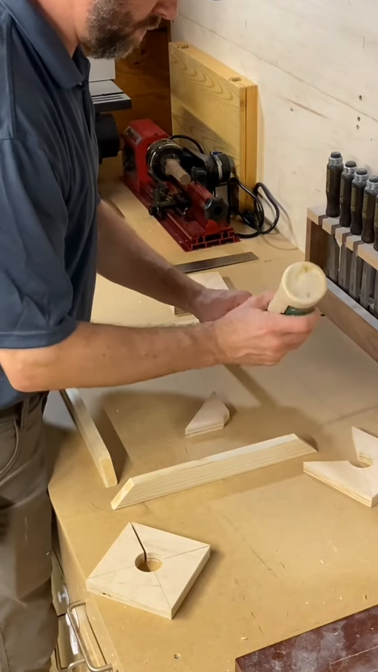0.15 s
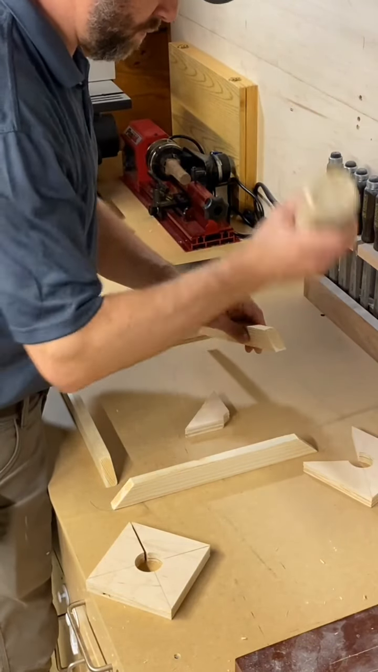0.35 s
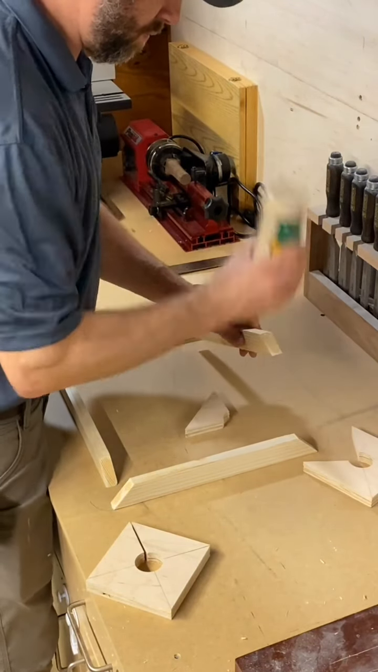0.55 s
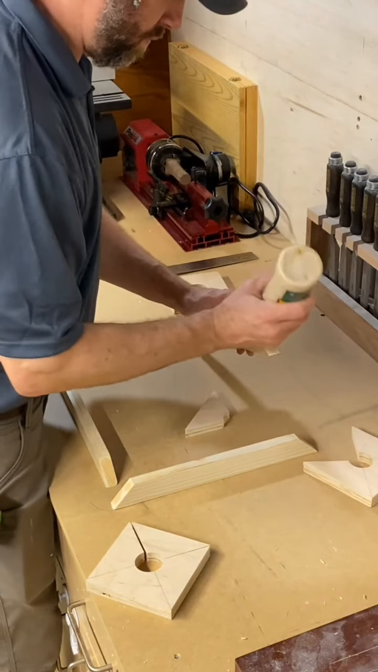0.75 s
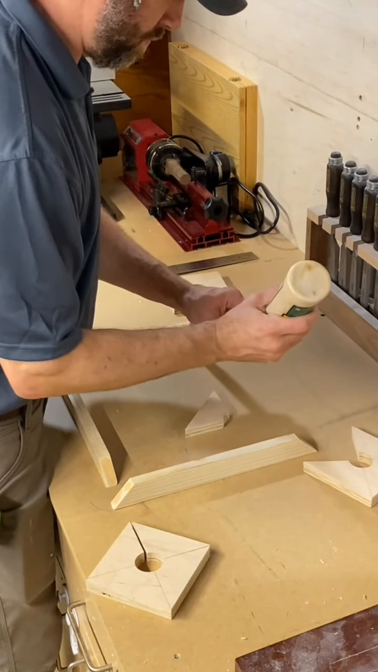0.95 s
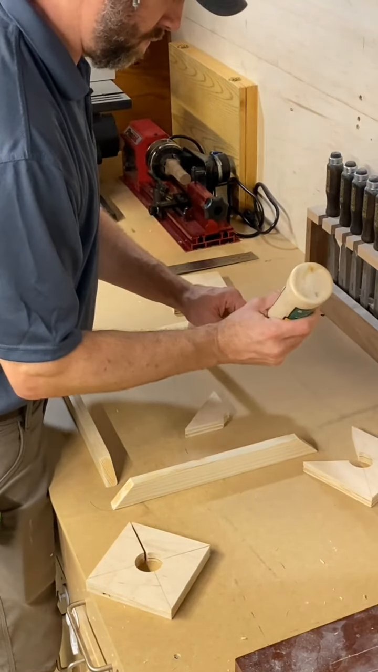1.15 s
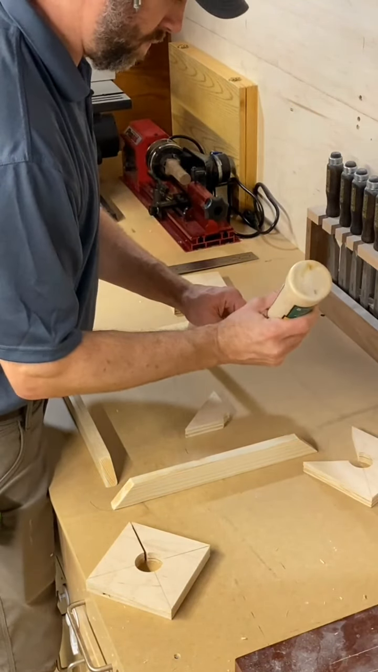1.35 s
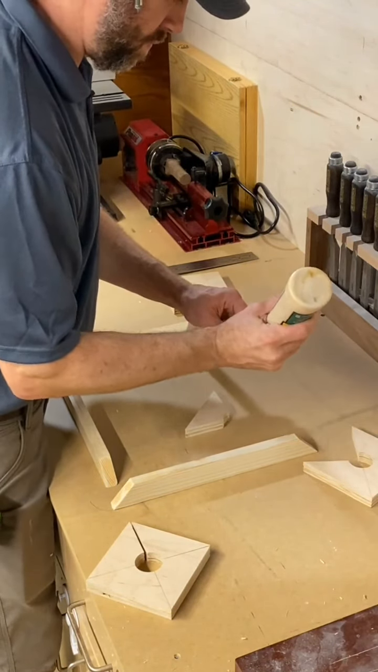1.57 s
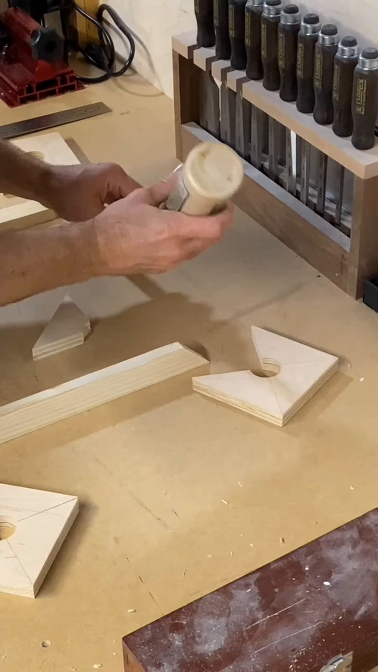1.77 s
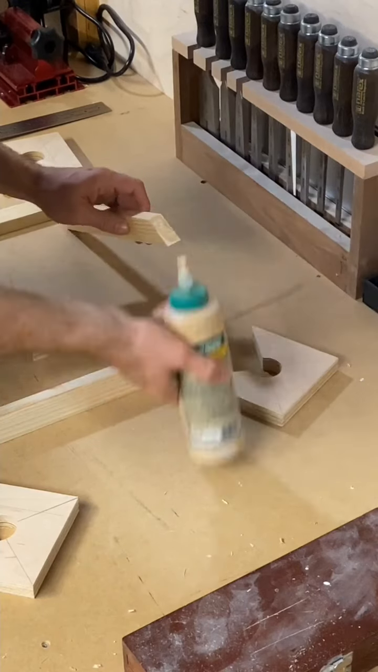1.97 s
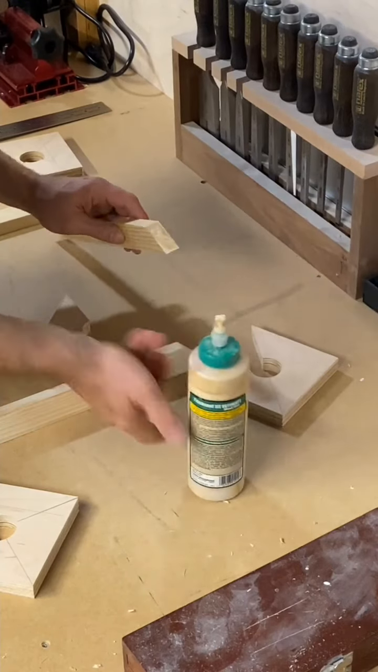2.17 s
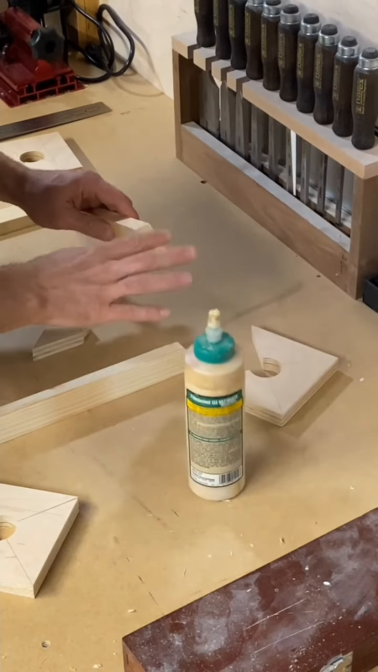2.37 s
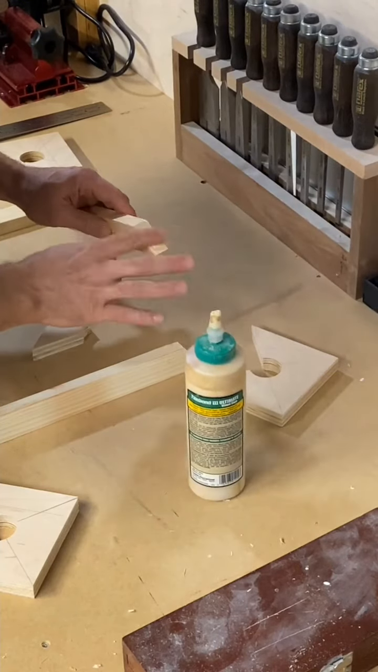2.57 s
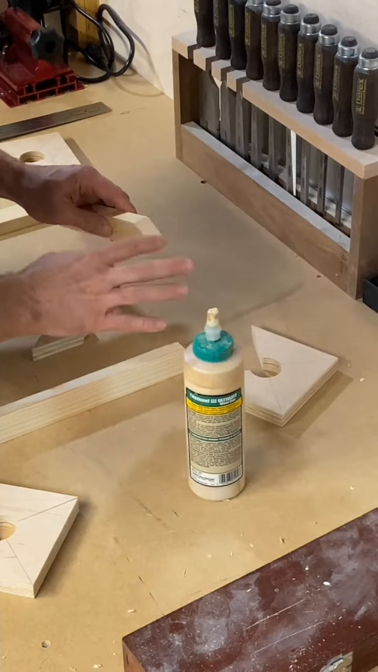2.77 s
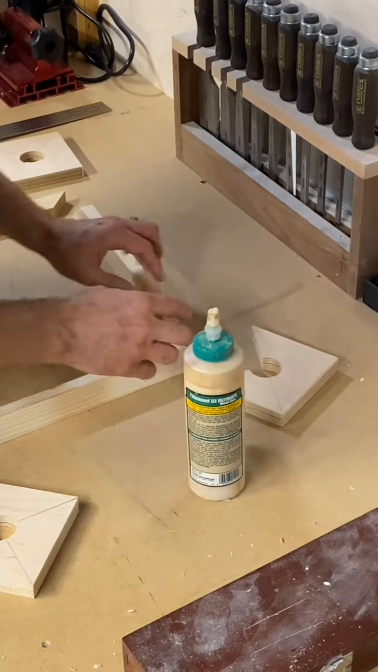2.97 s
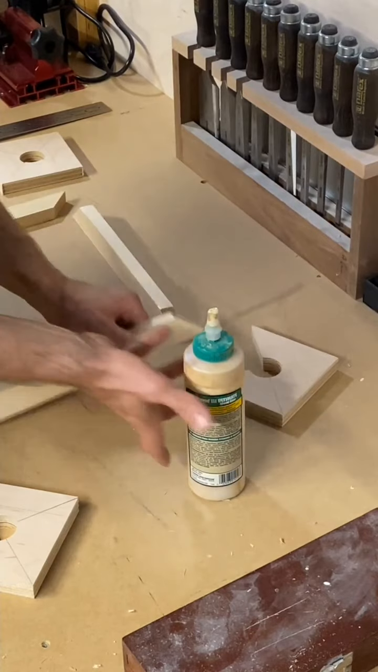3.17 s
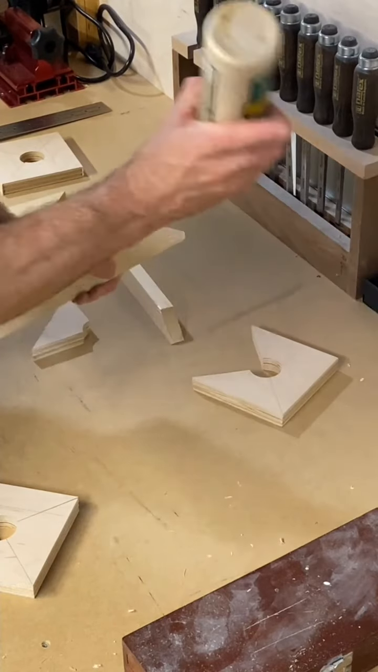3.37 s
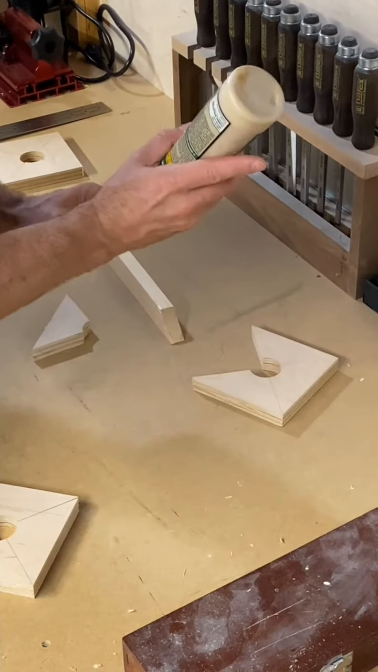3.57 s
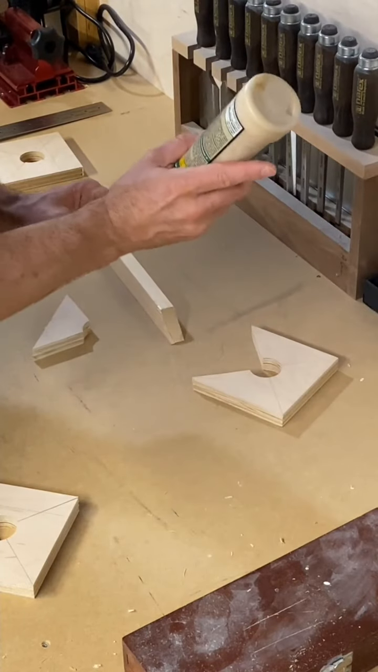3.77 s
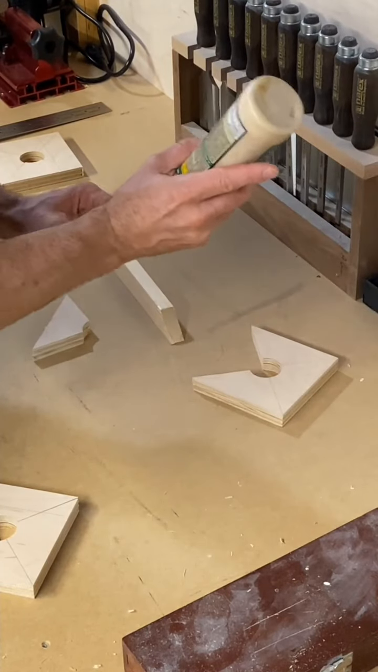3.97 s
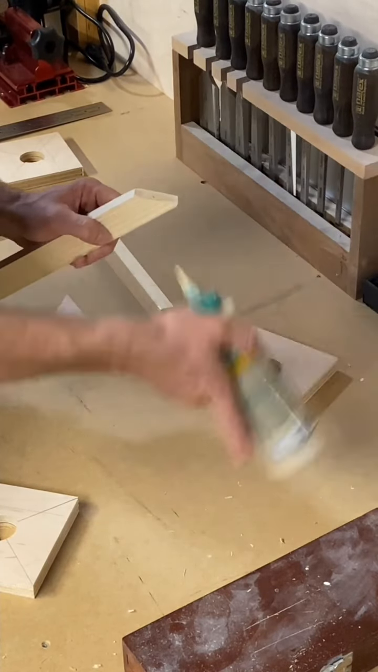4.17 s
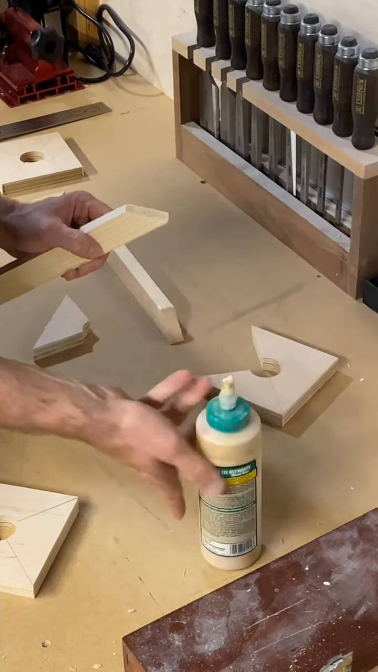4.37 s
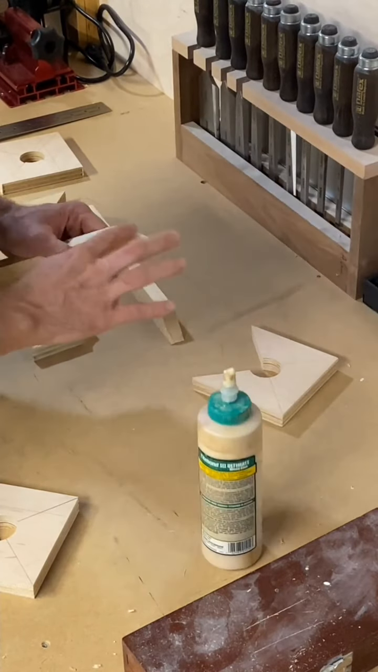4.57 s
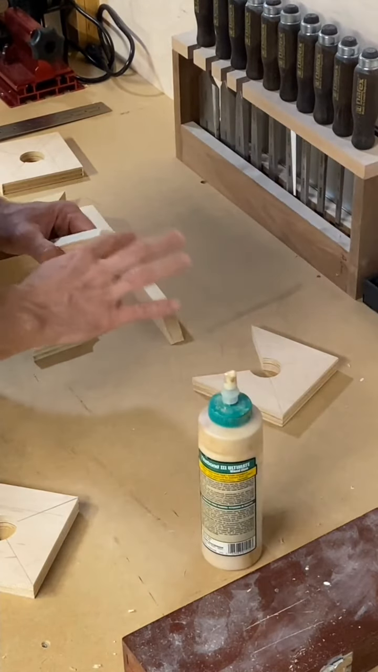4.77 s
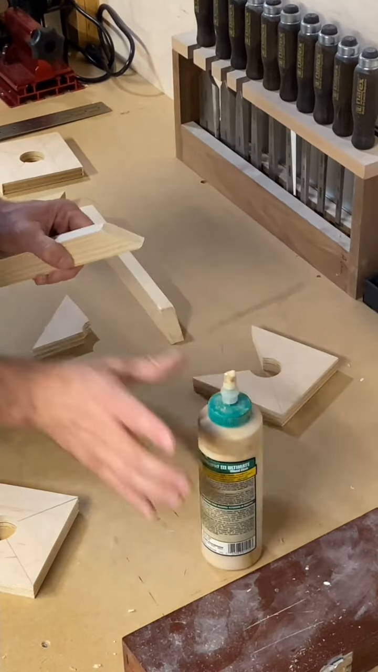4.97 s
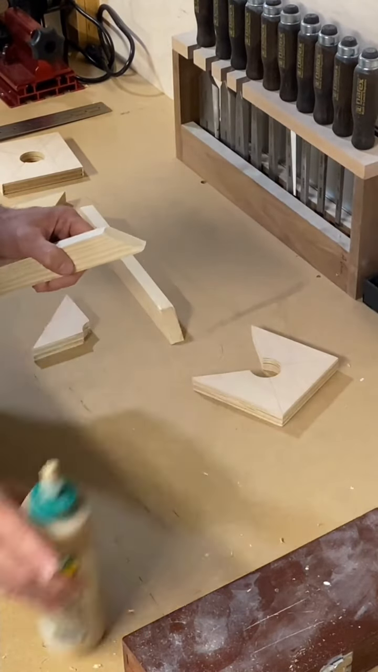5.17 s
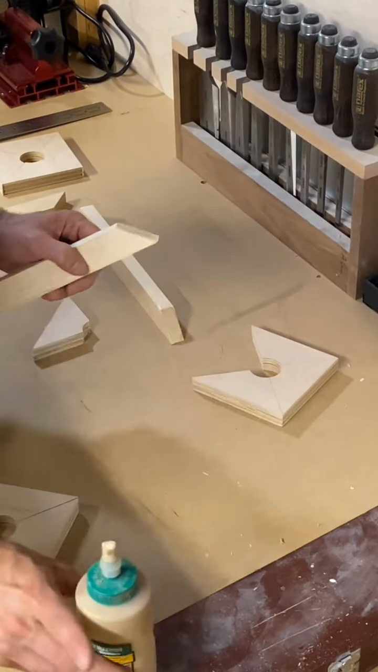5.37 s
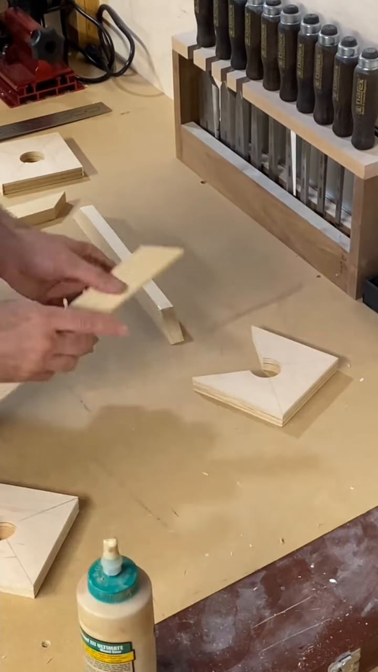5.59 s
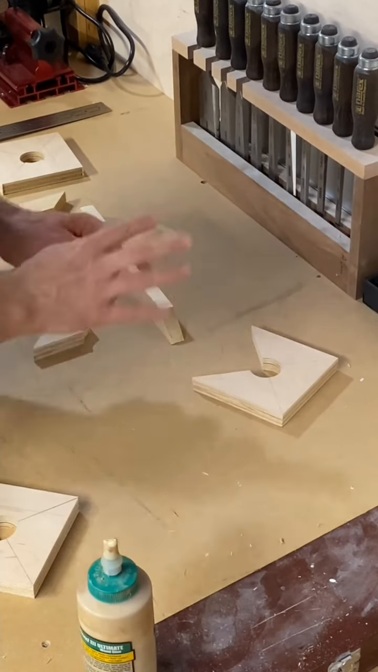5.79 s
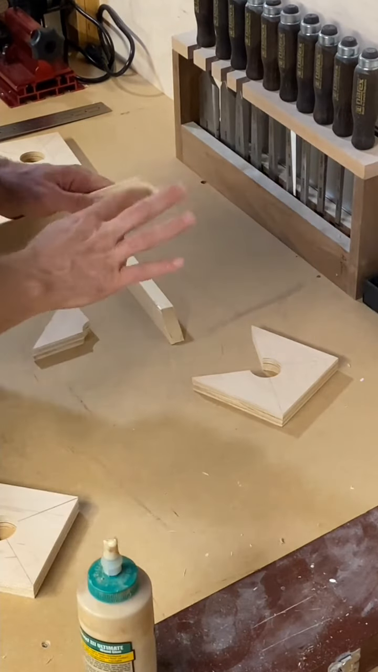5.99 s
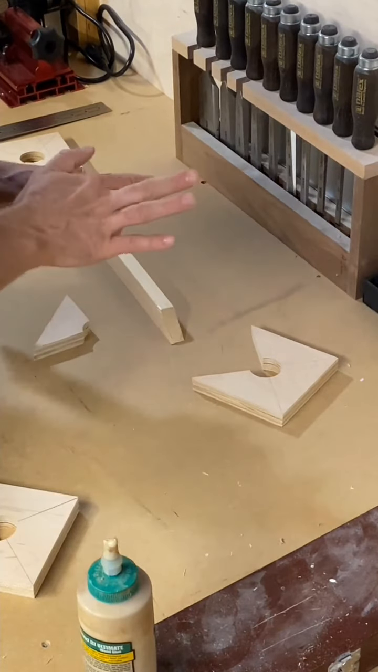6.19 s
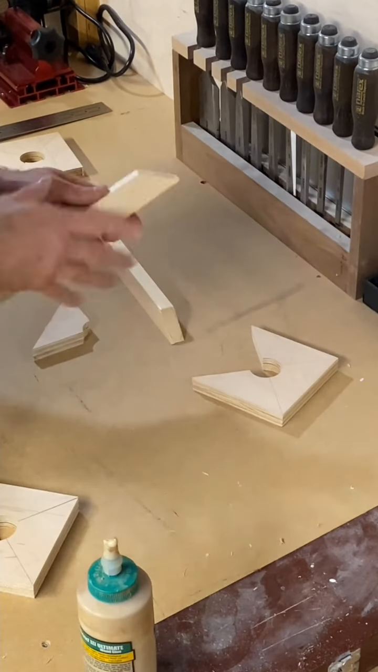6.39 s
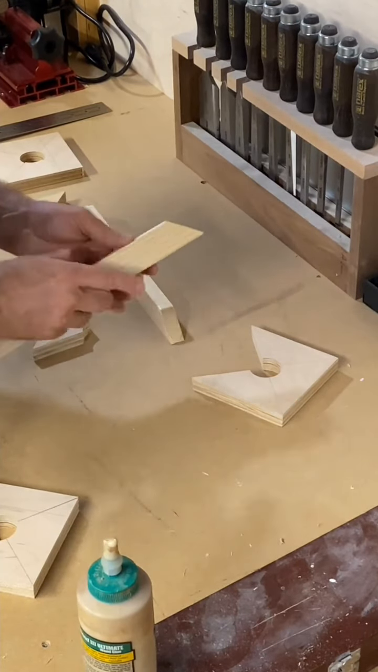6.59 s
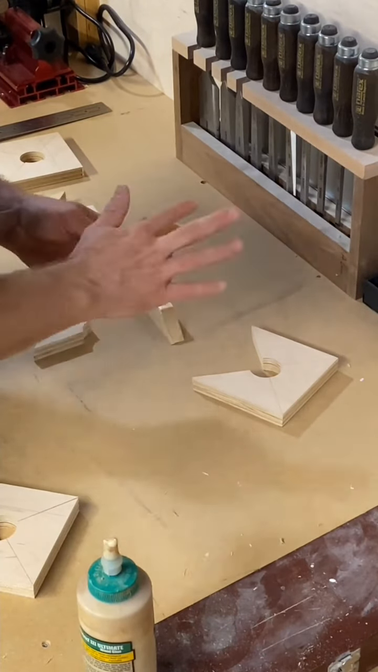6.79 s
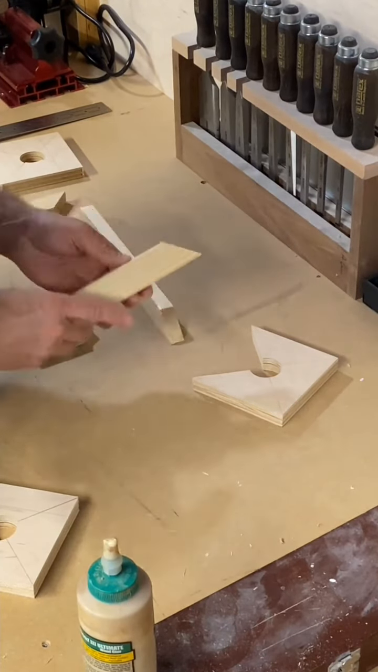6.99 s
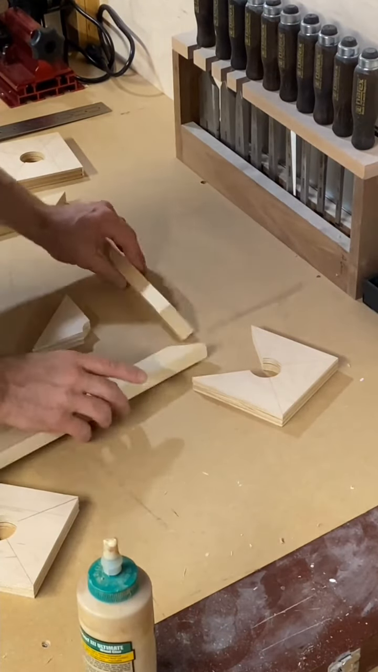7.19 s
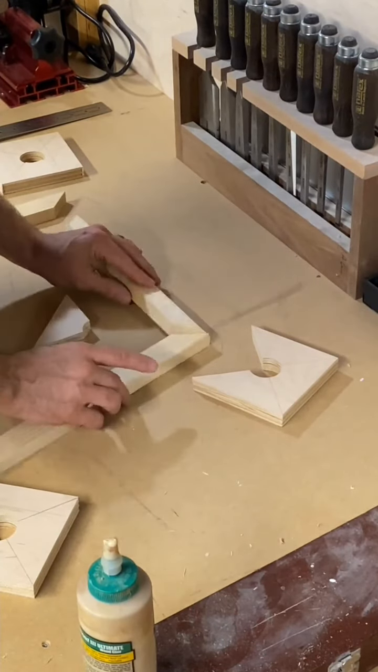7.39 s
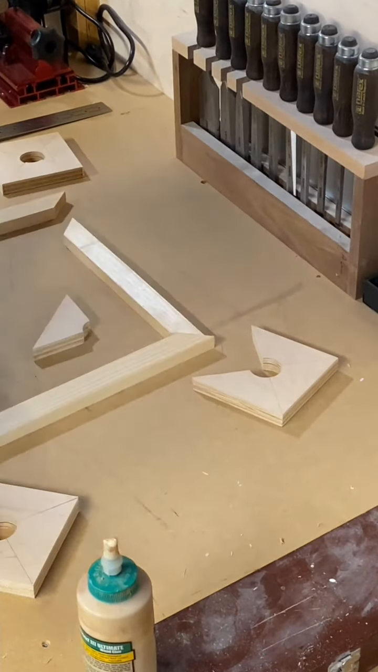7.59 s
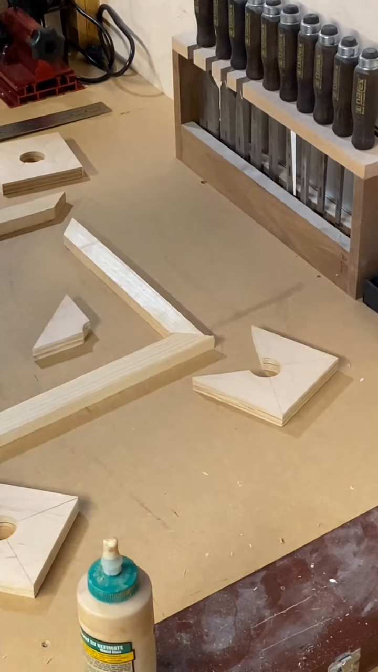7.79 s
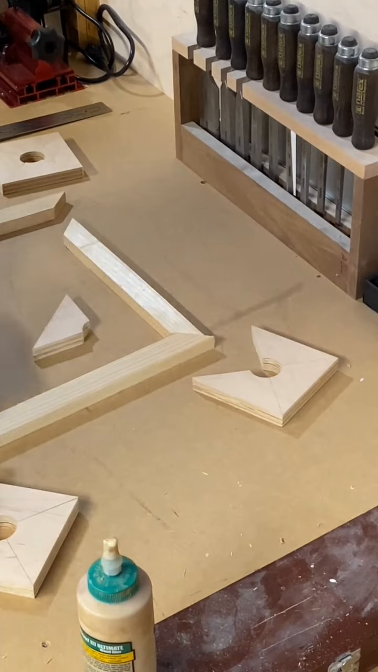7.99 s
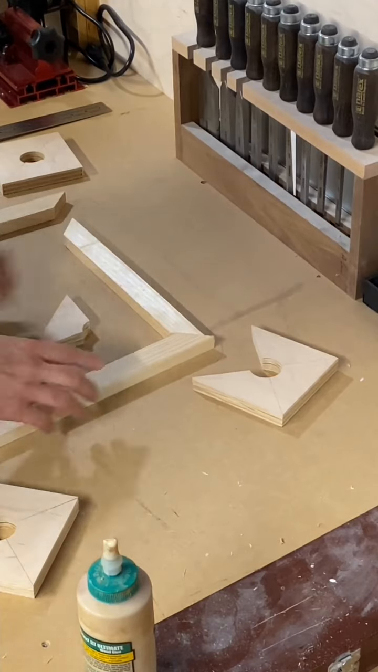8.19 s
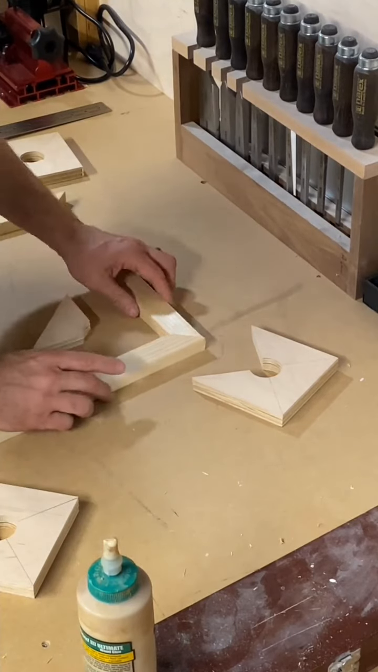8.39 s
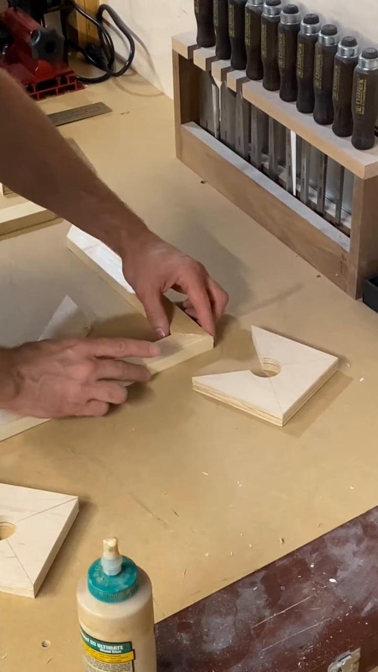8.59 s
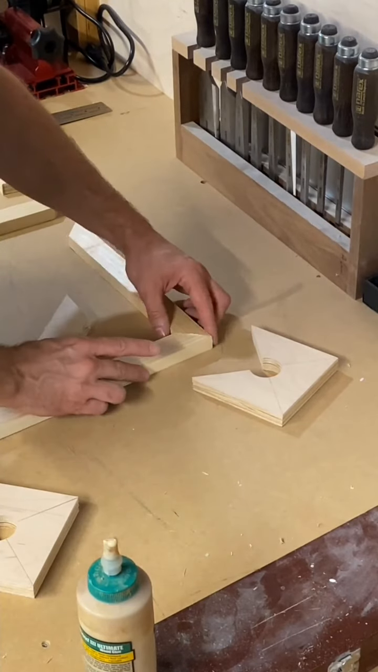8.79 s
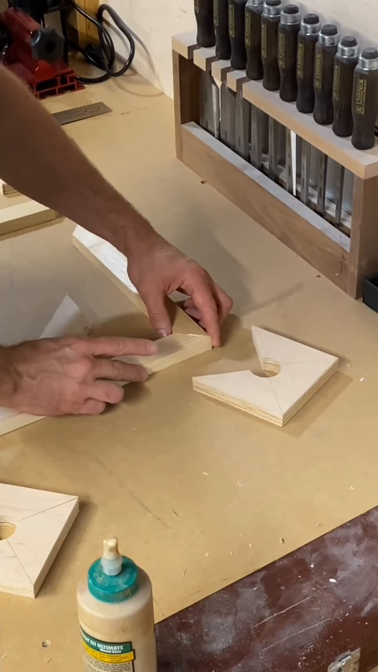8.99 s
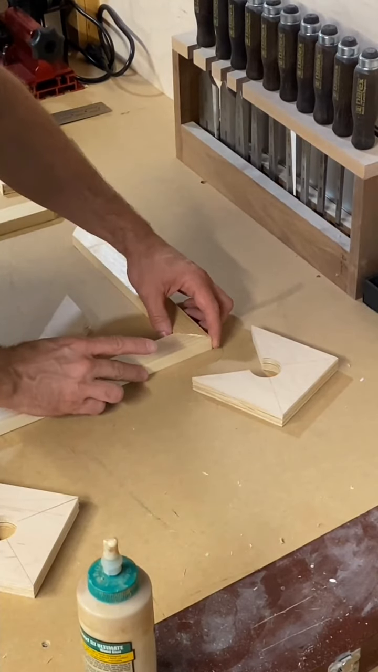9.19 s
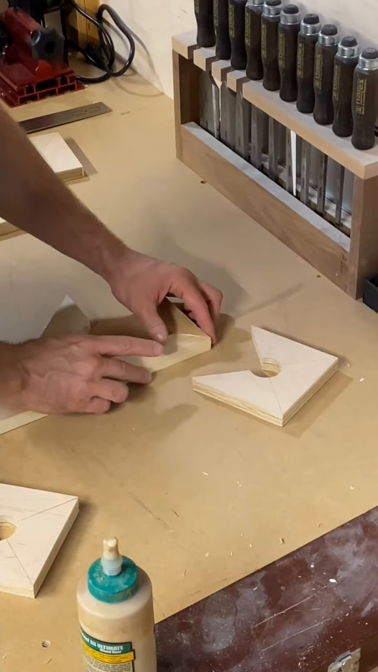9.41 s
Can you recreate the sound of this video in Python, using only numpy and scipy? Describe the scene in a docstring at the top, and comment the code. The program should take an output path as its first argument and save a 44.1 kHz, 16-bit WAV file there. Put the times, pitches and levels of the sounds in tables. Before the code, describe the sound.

Close view of a workbench in a small room. A soft airy rustle and faint clicks come from a shaken glue bottle, then a tiny low blip and a heavy thump as it is set down. Sticks clack together, the bottle thumps again and is shoved with a judder, fingers wipe wood, and sticks knock and slide into place over a low unsteady hum.

```python
"""Wooden sticks are laid on a bench, knocked together and slid into place as a frame is glued up.
Each contact is a short force that excites damped modes of stick and bench and the reflections of a small workshop.
A plastic glue bottle is shaken, squeezed, set down twice and pushed aside, by blows and shaped friction noise.
Fingers wiping, sliding and brushing are grainy noise under bell-shaped strokes; one low blip is a gliding sine.
A low, restless hum of filtered noise lies behind it all."""
import sys
import numpy as np
from scipy import signal
from scipy.fft import rfft, irfft, next_fast_len
from scipy.io import wavfile
from scipy.ndimage import map_coordinates

SR = 44100
rng = np.random.default_rng(int(sys.argv[2]) if len(sys.argv) > 2 else 0)


def master(y):
    """Save y as 16-bit WAV."""
    cut = np.clip(np.atleast_2d(y).T, -1, 1)
    pcm = np.round(cut * 32767)  # scale
    wavfile.write(sys.argv[1], SR, pcm.astype(np.int16))


N = 416744
TIME = np.arange(N) / SR
SIZE = 16384  # length of an impulse response, samples
HZ = np.fft.rfftfreq(SIZE, 1 / SR)
TOP_HZ = 16000  # upper band limit

# modes of the bench top: f/Hz, relative level/dB, t60/s
BENCH = [(129.1, 19, 0.3), (195.8, 2.5, 0.19), (248.8, 11.5, 0.18), (294.4, 16.5, 0.21), (344, 14, 0.17),
         (396, 9.5, 0.15), (474, -3, .2), (568, 8, 0.11), (615, 7.5, .2), (710, 10, 0.066), (860, -1, 0.28),
         (950, 12, 0.2), (1048, 8.5, .15), (1203, 11, 0.061), (1304, 12, 0.28), (1378, 16, .15),
         (1620, 4, .14), (1745, 3, 0.36), (1900, -1.5, .12), (2356, 13, .1), (2565, -4, .1),
         (3063, 3.5, 0.15), (3400, 9, 0.066), (3980, 12, .08), (4250, 4.5, 0.24), (4760, 13.5, 0.054)]
# bending modes of a free stick: f/Hz, relative level/dB, t60/s
STICK = [(853, -10, .13), (2205, 12, .19), (3570, 10, 0.064), (3690, 14.5, 0.037), (3920, 6.5, 0.031),
         (5410, 17, 0.025), (5550, 11.5, 0.2), (6410, 11, 0.047), (7800, 12, 0.23), (9350, 15, .1),
         (10100, 10, .12)]
# centres of the thud, knock, clack, snap and tick bands: f/Hz
BAND_HZ = [230, 650, 1550, 4300, 8500]
# stereo width of noise and reflections: f/Hz, side level relative to mid/dB
SPREAD = [(140, -22), (330, -13.5), (770, -11), (1170, -8), (1790, -7), (2740, -3), (4190, -18),
          (6410, -30.5), (10000, -37), (15000, -17.5)]


def amp(db):
    """The level law: decibels to an amplitude ratio."""
    return 10 ** (np.asarray(db) / 20)


def unit(x):
    """Normalisation to a root-mean-square value of 1."""
    return x / np.sqrt(np.mean(x ** 2) + 1e-20)


def together(parts_db):
    """Incoherent addition: the powers of simultaneous sounds sum."""
    return 10 * np.log10(np.sum(amp(parts_db) ** 2, axis=0))


def along(points, hz):
    """Interpolation of (f/Hz, value) points on a logarithmic frequency axis."""
    f, v = np.transpose(points)
    return np.interp(np.log(hz + 1), np.log(f), v)


def curves(rows):
    """Linear interpolation in time: one curve for each column after t/s."""
    s, *cols = np.transpose(rows)
    return [np.interp(TIME, s, c) for c in cols]


def wobble(rate):
    """Slow random fluctuation: a spline through normal deviates, rate knots a second."""
    knots = rng.standard_normal(int(N * rate / SR) + 4)
    return map_coordinates(knots, [TIME * rate])


def swell(s, hold, db, drift_db, rise_db, fall_db):
    """Exponential envelope: level/dB rises until s, drifts for hold seconds, then falls; slopes in dB/s."""
    t = TIME - s
    rise = rise_db * np.minimum(t, 0)
    drift = drift_db * np.clip(t, 0, hold)
    fall = fall_db * np.maximum(t - hold, 0)
    return db + rise + drift - fall


def coloured(x, gain):
    """Linear filtering: the spectrum of x times a gain given on the HZ grid."""
    m = next_fast_len(N + 8192)
    gain = np.interp(np.fft.rfftfreq(m, 1 / SR), HZ, gain)
    return irfft(rfft(x, m) * gain, m)[..., :N]


def stereo(pair):
    """Sum and difference: mid and side to left and right."""
    mid, side = pair
    return np.array([mid + side, mid - side])


def width(spread):
    """Stereo width: spectral gains of mid and side for (f/Hz, side level/dB) points."""
    return np.array([np.ones(len(HZ)), amp(along(spread, HZ))])


def noise(gain, grain_db=0, spread=SPREAD):
    """Filtered stereo noise of rms 1; amplitude modulation by grain_db makes it catch and slip."""
    grain = amp(grain_db * np.tanh(wobble(350)))
    drive = rng.standard_normal((2, N)) * grain
    mid_side = [coloured(d, gain * w) for d, w in zip(drive, width(spread))]
    return unit(stereo(mid_side))


def wavering(pair, depth, rate):
    """Frequency modulation by a varying playback speed, as the grip shifts."""
    position = np.cumsum(1 + depth * wobble(rate))
    return np.array([map_coordinates(ch, [position], order=5, mode="reflect") for ch in pair])


def askew(pair, from_hz, turn_hz):
    """Path difference: off-axis treble reaches two microphone ports out of step, one phase turn per turn_hz."""
    phase = np.pi * np.maximum(np.fft.rfftfreq(N, 1 / SR) - from_hz, 0) / turn_hz
    return irfft(rfft(pair) * np.exp([-1j * phase, 1j * phase]), N)


def causal(gain):
    """Minimum phase: the folded cepstrum gives the causal response with this gain."""
    cep = irfft(np.log(np.maximum(gain, 1e-6)))
    cep[1:SIZE // 2] *= 2
    cep[SIZE // 2 + 1:] = 0
    return np.exp(rfft(cep))


def ringing(modes, damping=1):
    """Modal superposition: a sum of damped resonances; damping above 1 broadens them as a firm grip does."""
    total = 0
    for k, (hz, db, t60) in enumerate(modes):
        band = damping * np.log(1000) / (np.pi * t60)  # half-power bandwidth, Hz
        resonance = 1j * HZ * band / (hz ** 2 - HZ ** 2 + 1j * HZ * band)
        total = total + (-1) ** k * amp(db) * resonance
    return total


def echoes(t60_points, onset):
    """Diffuse reverberation: dense reflections build up and decay, energy-normalised before the stereo width."""
    hz, t, z = signal.stft(rng.standard_normal((2, SIZE)), SR, nperseg=128)
    decay = amp(-60 * t / along(t60_points, hz)[:, None])
    tail = signal.istft(z * decay, SR, nperseg=128)[1][:, :SIZE]
    build_up = 1 - np.exp(-np.arange(SIZE) / SR / onset)
    response = rfft(tail * build_up)
    # expected energy: the integral of the squared envelope
    loss = 2 * np.log(1000) / along(t60_points, HZ)
    energy = SR * (1 / loss - 2 / (loss + 1 / onset) + 1 / (loss + 2 / onset))
    return response / np.sqrt(energy) * width(SPREAD)


def contact(band_db, modes, bass_db, lag, click_db, crack_db, near_db, room_db):
    """Impact excitation: a force spectrum drives a ringing body, nearby reflections and the room."""
    # decay of the workshop: f/Hz, t60/s
    shop = [(100, 0.14), (400, 0.27), (1500, 0.27), (5000, 0.23), (9000, 0.23), (16000, .16)]
    thud, knock, clack, snap, tick = band_db
    low_end = [(35, thud - 36), (110, thud + bass_db)]
    high_end = [(13000, tick - 2), (16000, tick - 8)]
    force = along([*low_end, *zip(BAND_HZ, band_db), *high_end], HZ)
    # bending waves are dispersive: the bass leaves the board later than the click
    bend = np.sqrt(BAND_HZ[0] * HZ) - HZ * np.sqrt(BAND_HZ[0] / TOP_HZ) / 2
    delay = np.exp(-4j * np.pi * lag * bend)
    direct = np.array([[1], [0]]) * (amp(click_db) + modes)  # mid only
    crack = amp(crack_db) * echoes([(200, 0.02), (1500, 0.027), (8000, 0.015)], onset=0.0005)
    near = amp(near_db) * echoes([(200, 0.069), (2000, 0.073), (10000, .06)], onset=0.00087)
    room_tone = along([(300, -0.77), (2000, -3.9), (5000, -2.2), (10000, -2)], HZ)
    room = amp(room_db + room_tone) * echoes(shop, onset=0.012)
    # the reflections carry part of the body's ring
    carried = causal(np.sqrt(0.83 + 0.29 * np.abs(modes) ** 2))
    response = direct + crack + carried * (near + room)
    sound = irfft(causal(amp(force)) * delay * response)
    fade = np.clip(np.linspace(4, -1, SIZE), 0, 1)
    return stereo(sound * fade)


def add(track, s, sound):
    """Superposition: mix a sound in at s seconds."""
    start = round(s * SR)
    track[:, start:start + SIZE] += sound[:, :N - start]


def softening(length):
    """Contact time: a blow holds little above the frequency whose half cycle lasts as long as the contact."""
    return -10 * np.log10(1 + (2 * length * np.array(BAND_HZ)) ** 4)


def sticks_and_shake():
    """Impact excitation: contacts of sticks, and light clicks of the shaken bottle, drive one set of modes."""
    # contacts of sticks: t/s, strength level/dB, contact length/s, catching edge level/dB,
    # free stick ring level/dB, favoured mode f/Hz, favoured mode level/dB
    wood = [(2.8419, 29, 0.00075, -17, -8.5, 1360, 13.5), (2.873, 23, 0.00023, -32, -4.5, 1347, 15.5),
            (2.878, 16, 0.0011, -23.5, -14.5, 646, 8), (3.094, 6.5, 0.00092, -28.5, -10, 685, 16.5),
            (3.152, 16, 0.00056, -23, -2.5, 2247, 12), (5.493, -19, .0007, -21.5, 3.5, 5500, 10),
            (5.711, 20, 0.00035, -6.5, 1.5, 2184, 17), (6.506, 19.5, 0.0021, -19, 3, 2194, 25),
            (7.113, 15.5, 0.00025, -1.5, -12, 1470, -7), (7.119, 18, 0.00016, -0.5, -5.5, 1314, 13),
            (7.2272, 18, 0.00034, -25, 3.5, 3656, 19), (7.3394, 13, 0.00029, -2, -3, 3360, 13),
            (7.3878, 24.5, 0.00033, -11.5, -2.5, 3560, 10), (7.556, 5.5, 0.00096, -21, -12, 1027, 12),
            (7.585, 13.5, 0.0012, -18, -1, 996, 9), (7.924, 15, 0.0007, -21.5, -7, 3620, 12),
            (8.025, 15.5, 0.00022, -14.5, -3.5, 1476, 18), (8.0361, 20, 0.00016, -11.5, -3.5, 5560, 20),
            (8.262, 15.5, 0.0015, -50, -2, 328, 12), (8.292, 10, .0012, -33, 5, 560, -5),
            (8.793, 14.5, 0.002, -43, -5, 373, 11.5)]
    # light clicks as the bottle is shaken: t/s, strength level/dB
    click_rows = [(0.4871, -5), (0.544, 2.5), (.819, -16.5)]
    # colours of a blow, of a catching edge and of a click: thud, knock, clack, snap and tick level/dB
    wood_colour = np.array([1, 1.5, -1, 0, -12.5])
    edge_colour = np.array([-31, -17, -13.5, -7, -0.5])
    click_colour = np.array([-17, -32, 2, -7, -18.5])
    track = np.zeros((2, N))
    bench, stick = ringing(BENCH), ringing(STICK)
    blows = []
    for s, db, length, edge_db, ring_db, spot_hz, spot_db in wood:
        blow_db = db + softening(length) + wood_colour
        band_db = together([blow_db, edge_db + edge_colour])
        blows.append((s, band_db, ring_db, spot_hz, spot_db))
    for s, db in click_rows:
        blows.append((s, db + click_colour, -30, 1840, 4.5))
    for s, band_db, ring_db, spot_hz, spot_db in blows:
        # a nearly square stick bends two ways at slightly different pitches
        spot = ringing([(spot_hz, spot_db, .115), (spot_hz * .974, spot_db + 2.0, .115)])
        # every new support and grip gives the stick a few modes of its own
        loose_hz = 700 * 2 ** np.sort(rng.uniform(0, 4, size=9))
        loose = ringing([(hz, 5, .1) for hz in loose_hz])
        modes = amp(-7.5) * bench + amp(ring_db) * stick + 1j * (spot + loose)
        sound = contact(band_db, modes, bass_db=-16.0, lag=0.003005,
                        click_db=-8, crack_db=-3.5, near_db=-9.0, room_db=-3.5)
        add(track, s, sound)
    return track


def bottle():
    """Impact of a heavy body: the bottle thumps on its base, rocks to rest and judders when pushed."""
    # the bottle gripped, set down and shoved: t/s, thump of its weight level/dB,
    # clack of its base level/dB, click of its plastic level/dB
    bottle_rows = [(1.917, -23, -22, 0), (1.9539, 39, 17, -1), (4.194, 37, 6.5, -6.5),
                   (4.999, 15.5, -14.5, -5.5), (5.161, 9.5, -17.5, -2.5), (5.244, 17, -3.5, -30),
                   (5.275, 13, -3, -11), (5.309, 12, -16, -29.5)]
    # modes of the full plastic bottle: f/Hz, relative level/dB, t60/s
    flask = [(215.6, 4.5, 0.089), (240.3, -0.5, 0.37), (406.7, 5, 0.15), (492, 2, 0.18), (565, 9, .22),
             (694, -1.5, 0.11), (1790, -12, 0.1), (4020, 12, 0.077), (5800, 13, 0.067)]
    # colours of thump, clack and click: thud, knock, clack, snap and tick level/dB
    thump_colour = [1, -8.5, -42, -47, -84]
    clack_colour = [-5, 6, 2, -17, -30]
    click_colour = [-9, -43, -19.5, 0.5, -2.5]
    track = np.zeros((2, N))
    modes = amp(-15.5) * ringing(BENCH) + amp(-2.5) * ringing(flask)
    colours = np.array([thump_colour, clack_colour, click_colour])
    blows = [(s, together(colours + np.array(levels)[:, None])) for s, *levels in bottle_rows]
    rocks = [(s, db + colours[0]) for s, db in rocking(count=4)]
    for s, band_db in blows + rocks:
        sound = contact(band_db, modes, bass_db=-10.5, lag=0.0057,
                        click_db=-10.5, crack_db=-6.5, near_db=-6.0, room_db=-8)
        add(track, s, sound)
    return track


def rocking(count):
    """Energy loss in rocking: after its first landing the bottle rocks ever faster and softer (t/s, thump/dB)."""
    start_s, first_gap_s, shrink = 2.205, .087, .76
    first_db, loss_db = 12.5, .6
    k = np.arange(count)
    gaps = first_gap_s * shrink ** k
    return zip(start_s + np.cumsum(gaps) - gaps, first_db - loss_db * k)


def grinding():
    """Stick-slip friction: the bottle's base grinds as it settles or slides and excites low modes."""
    # grinds: t/s, hold/s, level/dB, change during the hold/(dB/s)
    grind_rows = [(2.23, .42, -38, -1.5), (5.164, 0.16, -31.5, 54.5)]
    # modes that are shaken: f/Hz, relative level/dB, t60/s
    grind_modes = [(110, -6.5, 0.1), (144, 3, .14), (233, -11, 0.033), (278, -10, 0.13)]
    level = sum(amp(swell(*row, rise_db=1200, fall_db=145)) for row in grind_rows)
    tone = amp(along([(40, -10.5), (100, 0), (1000, 2.5), (3000, -19.5)], HZ))
    return level * noise(np.abs(ringing(grind_modes)) * tone, grain_db=10)


def scuffing():
    """Resonant friction: short grainy bursts in one resonance of the plastic."""
    # a squelch after the shake, then a chatter as the bottle slides: t/s, standard deviation of the burst/s,
    # f/Hz, level/dB, t60 of the resonance before it is squared/s
    scuff_rows = [(0.613, 0.05, 1800, -50.5, 0.0037), (5.25, .005, 950, -28, .02),
                  (5.281, 0.0087, 892, -27, 0.025)]
    total = 0
    for s, spread_s, hz, db, t60 in scuff_rows:
        burst = np.exp(-np.minimum(((TIME - s) / spread_s) ** 2 / 2, 50))
        resonance = np.abs(ringing([(hz, 0, t60)])) ** 2
        total = total + amp(db) * burst * noise(resonance, grain_db=9.5)
    return total


def rubbing():
    """Friction noise: grainy rubbing hisses on skin, sings in the gripped stick and rumbles in the bench."""
    # a finger wipes glue along the held stick: t/s, half length/s, level before the mix/dB
    wipe_rows = [(3.12, .025, -58.5), (3.205, .035, -54.5), (3.93, 0.011, -59.5), (5.55, 0.05, -58),
                 (5.65, 0.038, -53), (6.109, 0.021, -54.5), (6.242, 0.012, -66), (6.343, .02, -57.5),
                 (6.444, 0.024, -51.5), (6.52, 0.035, -57), (6.586, 0.019, -57.5), (6.967, 0.016, -59)]
    # a stick or the bottle slides over the bench: t/s, half length/s, level before the mix/dB
    slide_rows = [(3.18, 0.05, -59.5), (5.187, 0.014, -45.5), (5.268, 0.036, -45.5), (7.267, .035, -50),
                  (7.368, 0.027, -49.5), (8.02, 0.072, -57), (8.294, 0.041, -54.5), (8.546, 0.023, -51),
                  (8.802, .016, -60.5), (9.06, .09, -68.5), (9.262, 0.018, -59)]
    # the hand brushes bottle or wood as its grip shifts: t/s, half length/s, level before the mix/dB
    brush_rows = [(.125, 0.015, -42), (.292, 0.013, -61), (1.907, .03, -53.5), (3.32, .025, -53),
                  (3.404, 0.026, -59), (4.138, 0.037, -51), (5.184, 0.011, -39), (5.222, .016, -36.5),
                  (5.268, 0.016, -43), (5.928, 0.03, -60.5), (7.62, 0.045, -49), (8.423, 0.065, -64),
                  (9.326, .017, -52.5), (9.43, .06, -62)]
    # mixes of the three: skin hiss, stick ring and bench rumble level/dB
    wipe_mix = [0.5, 1, -1.5]
    slide_mix = [1.5, -10.5, 14.5]
    brush_mix = [1, -13.5, -15]
    # spectrum of the skin hiss: f/Hz, relative level/dB
    skin_points = [(300, -8.5), (1500, -19), (3500, -0.5), (6000, 0), (9000, 0.5), (12000, -5), (16000, 2)]
    # spectrum that scrapes the bench: f/Hz, relative level/dB
    scrape_points = [(60, -16.5), (140, -6.5), (330, -8.5), (700, -13.5), (1200, -19), (2500, -26.5),
                     (6000, -58)]
    power = strokes(wipe_rows, wipe_mix)
    power = power + strokes([*slide_rows, *fidgets(count=10)], slide_mix)
    power = power + strokes(brush_rows, brush_mix)
    hiss, ring, drag = np.sqrt(power)
    skin = amp(along(skin_points, HZ))
    gripped = np.abs(ringing(STICK, damping=1.8)) ** 1.35
    stick_tone = [(800, -26.0), (2200, -13), (3700, -2), (5400, 3.5), (7000, -4.5), (11000, 0.5)]
    stick = gripped * amp(along(stick_tone, HZ))
    bench = amp(along(scrape_points, HZ)) * (0.63 + np.abs(ringing(BENCH)))
    # the fingertip presses unevenly along each stroke
    pressure = amp(3.5 * np.tanh(wobble(60)))
    hissing = hiss * noise(skin, grain_db=3.0)
    singing = ring * wavering(noise(stick, grain_db=8.5), depth=.008, rate=14)
    rumbling = drag * noise(bench, grain_db=3.5)
    return pressure * (hissing + singing) + rumbling


def strokes(rows, mix_db):
    """Gaussian envelopes: summed power of hiss, ring and rumble; power falls to 1/e at the half length."""
    power = 0
    for s, half, db in rows:
        power = power + amp(2 * db) * np.exp(-np.minimum(((TIME - s) / half) ** 2, 50))
    return amp(mix_db)[:, None] ** 2 * power


def fidgets(count):
    """Random events: faint, short slips of the fingers, uniformly scattered in time and level."""
    from_s, half_s, mean_db, scatter_db = 3.4, .014, -72, 3
    rows = []
    for when, force in rng.random((count, 2)):
        s = from_s + when * (N / SR - from_s)
        rows.append((s, half_s, mean_db + scatter_db * (2 * force - 1)))
    return rows


def squeezing():
    """Shaped noise: a wide rustle over an easing rumble as the bottle is squeezed, then a soft brush as it lifts."""
    # spectrum of the rumble: f/Hz, relative level/dB
    rumble_points = [(13, -65), (22, -10.5), (74, 12), (162, -0.5), (193, -13.5), (270, -6), (334, -11.5),
                     (631, -18), (867, -28), (1500, -74), (1950, -86), (3300, -120)]
    # spectrum of the rustle: f/Hz, relative level/dB
    rustle_points = [(600, -45), (1900, 3), (3000, 5), (6000, 4.5), (8000, 6), (10200, 8), (12200, 11),
                     (14300, 7.5), (16000, -3)]
    # stereo width of the rustle: f/Hz, side level relative to mid/dB
    rustle_spread = [(500, -18), (2000, -62), (5000, -59)]
    held = np.interp(TIME, [1.56, 1.61], [1, 0])
    rumble_db = -36.5 - 3 * TIME + wobble(14.4)
    rumble = amp(rumble_db) * noise(amp(along(rumble_points, HZ)))
    # the rustle rises, holds and fades to a faint hiss
    rustle_db = swell(0.12, 0.36, db=-42, drift_db=-9.5, rise_db=96, fall_db=67)
    rustle_db = np.maximum(rustle_db, -62.5 - 5.5 * TIME)
    rustle_noise = noise(amp(along(rustle_points, HZ)), grain_db=2.5, spread=rustle_spread)
    rustle = amp(rustle_db + wobble(28.8)) * rustle_noise
    lift_tone = [(300, -2), (900, 2.5), (1700, -8), (4000, -18.0), (15000, -25.5)]
    lift_level = amp(-55.0) * np.exp(-np.abs(TIME - 1.61) / 0.069)
    lift = lift_level * noise(amp(along(lift_tone, HZ)))
    return held * (rumble + askew(rustle, from_hz=6950, turn_hz=4150)) + lift


def blip():
    """Frequency modulation of a sine: a low blip that sinks in pitch and swells twice."""
    # t/s, f/Hz, level/dB
    hz, db = curves([(1.73, 383, -83), (1.741, 362, -33.5), (1.757, 322, -44), (1.78, 269, -33),
                     (1.8, 290, -39), (1.85, 278, -72), (1.9, 278, -140)])
    sounding = (TIME > 1.73) & (TIME < 1.9)
    phase = 2 * np.pi * np.cumsum(hz) / SR
    return sounding * amp(db) * np.sin(phase)


def workshop():
    """Stationary noise made restless: a low hum with faint hiss whose level wanders."""
    # mean hum level: t/s, level/dB
    hum_rows = [(0, -41), (1.55, -53.5), (1.92, -45), (2.3, -42.5), (3.4, -45.5), (4.4, -42.5),
                (5.6, -41.5), (8.2, -45.5), (9.45, -42.5)]
    # spectrum of the hum: f/Hz, relative level/dB
    hum_colour = [(20, -72), (30, -53.5), (68, -15.5), (135, 5.5), (259, -7.5), (384, -15), (632, -20),
                  (800, -20.5), (1500, -29), (2480, -40), (3310, -44.5), (8740, -49.5), (13700, -53.5),
                  (15500, -75)]
    hum_db, = curves(hum_rows)
    return amp(hum_db + .9 * wobble(7.7)) * noise(amp(along(hum_colour, HZ)))


def scene():
    """Superposition of everything on and around the bench."""
    impacts = sticks_and_shake() + bottle()
    friction = grinding() + scuffing() + rubbing()
    return impacts + friction + squeezing() + blip() + workshop()


def record(dry):
    """Soft saturation and band limitation: the highest peaks are rounded, nothing above TOP_HZ is kept."""
    rounded = dry / (1 + np.abs(dry / .85) ** 6) ** (1 / 6)
    return coloured(rounded, 1.0 * (HZ < TOP_HZ))


dry = scene()
out = record(dry)
master(out)
```